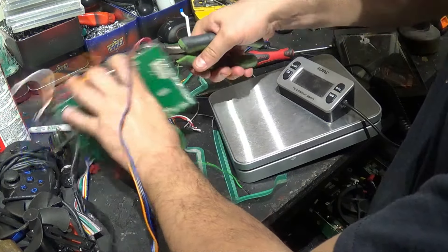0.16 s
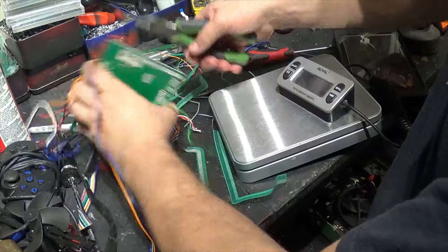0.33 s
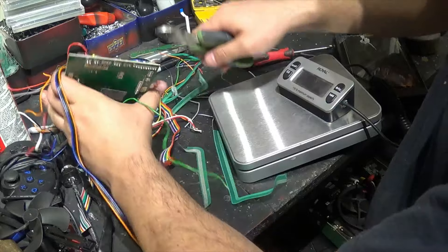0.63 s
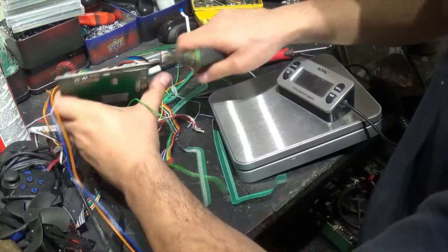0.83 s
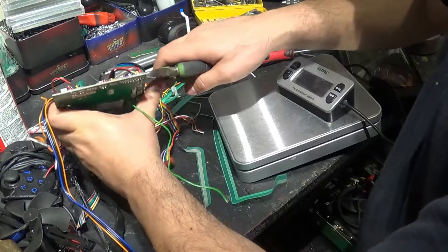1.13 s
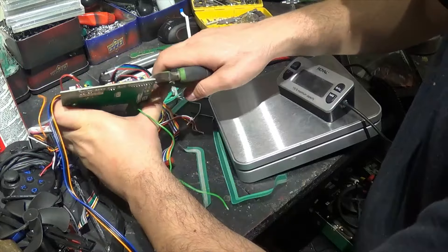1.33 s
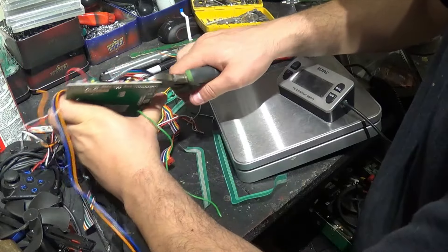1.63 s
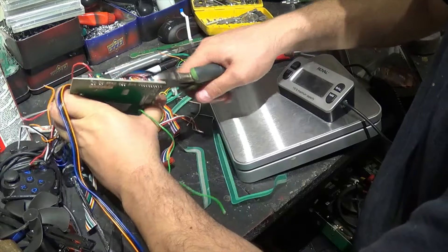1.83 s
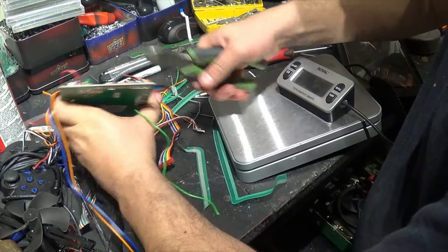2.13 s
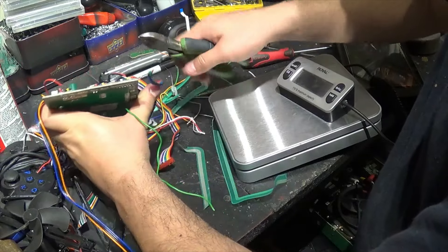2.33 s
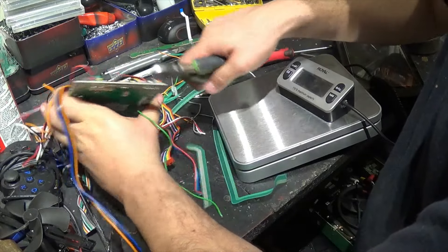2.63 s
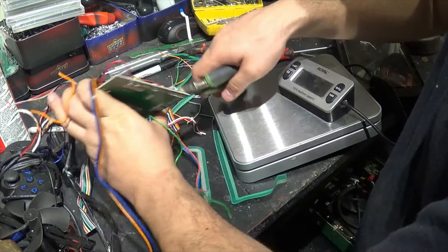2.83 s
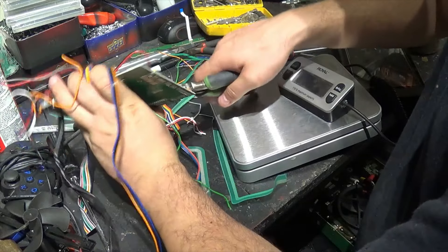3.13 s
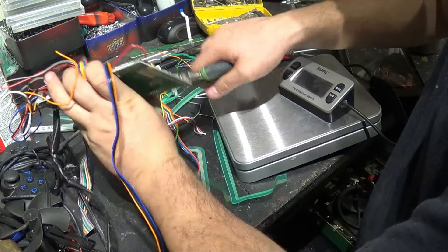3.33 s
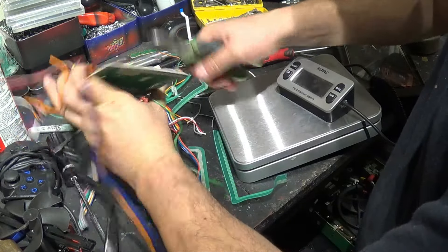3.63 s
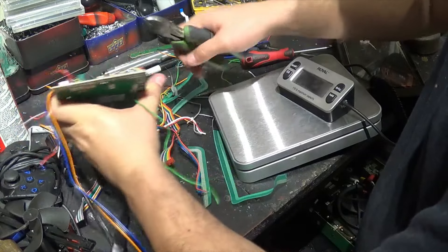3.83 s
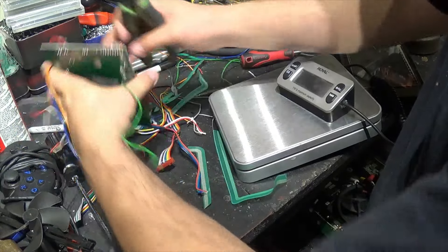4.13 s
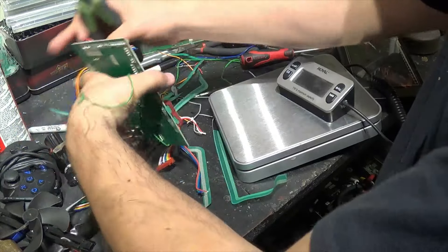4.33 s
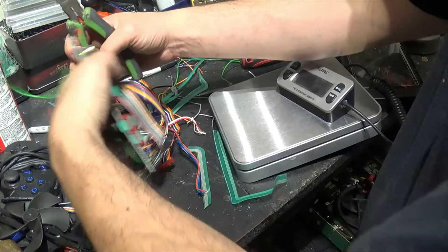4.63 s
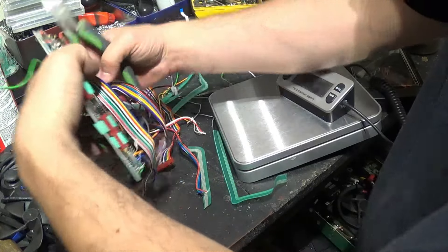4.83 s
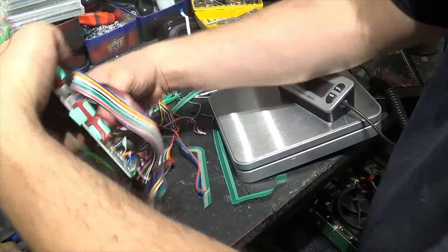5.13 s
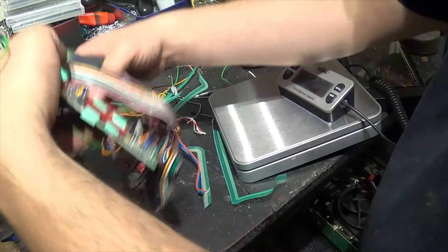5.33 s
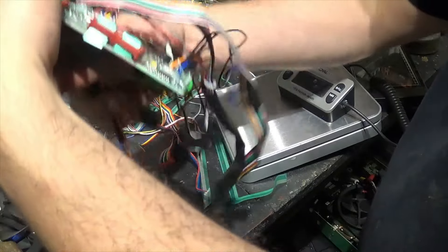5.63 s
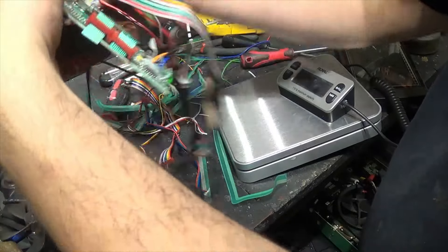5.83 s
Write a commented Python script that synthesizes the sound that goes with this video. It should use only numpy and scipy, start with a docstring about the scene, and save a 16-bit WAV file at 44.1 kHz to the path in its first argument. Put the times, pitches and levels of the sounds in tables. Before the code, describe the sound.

Steel cutter jaws crack crisply through wires on a circuit board: one snip, a tight triple snap, then a duller snip. Insulation rustles, wire drags and loose plugs tick in between. A sharp knock leads to two clattering runs as the board is flipped over, then the sound settles into light rustling. A soft low fan drone continues throughout; close stereo microphones in a small, slightly live room.

```python
"""Hand cutters snip wires off a circuit board: noise bursts ring the jaws in three hard cuts, one a triple crack.
Between cuts, shaped noise makes the wires rustle and scrape, and small ringing bursts make parts tick.
At the end the board is turned over and clatters on the bench: runs of knocks ring its many resonances.
A fan hums throughout, made of wavering tones over soft noise. A small room adds fading noise tails,
and a limiter flattens the loud blows."""
import sys
import numpy as np
from scipy import signal
from scipy.fft import rfft, irfft, next_fast_len
from scipy.io import wavfile
from scipy.ndimage import uniform_filter1d, minimum_filter1d, map_coordinates

SR = 44100
rng = np.random.default_rng(int(sys.argv[2]) if len(sys.argv) > 2 else 0)


def file_out(sig):
    """Save sig as 16-bit WAV at sys.argv[1]."""
    # one column per channel
    cols = np.atleast_2d(sig).T
    # limit, then scale
    lim = np.clip(cols, -1, 1)
    pcm = np.round(lim * 32767).astype(np.int16)
    wavfile.write(sys.argv[1], SR, pcm)


N = 263277
TIME = np.arange(N) / SR  # seconds
TOP_HZ = 11260  # highest frequency kept [Hz]

# Fan tones: (pitch [Hz], average level [dB])
FAN_TONES = [(59.2, -64.5), (118.6, -63.5), (247.6, -89), (292.8, -50.5), (335, -65), (360, -92),
             (387.4, -61), (410, -70.5), (535, -66), (4150, -71.5)]
# Tone balance of the fan's rush of air: (frequency [Hz], relative level [dB per Hz])
AIR_SPECTRUM = [(25, -17), (50, -2), (95, -13), (150, 1), (195, -0.5), (235, 10), (275, 0), (370, 7),
                (490, -6), (560, -5), (800, -6.5), (2000, -12), (4500, -16.5), (11000, -24.5)]
# Fan direction: (frequency [Hz], lead of left over right [rad], negative = right leads)
FAN_LEAD = [(60, -0.28), (130, -0.022), (300, -0.28), (1200, -1.2), (5000, -0.77), (10000, -0.71)]

# How briskly the cable bundle shifts in the hand: (time [s], base level [dB])
HANDLING = [(0.0, -57.5), (0.23, -59.5), (0.35, -56.5), (0.53, -61), (1.18, -68), (3.39, -64), (3.57, -58),
            (3.77, -70), (4.01, -61), (4.12, -59), (5.12, -55.5), (5.47, -63), (5.64, -61), (5.97, -61)]
RUSTLE_DB, RUB_DB, RUB_SWING_DB = 2.5, 4, 0.5  # rustle and light rubbing, added to the handling level
STRAY_DB, STRAY_SPREAD_DB = 12, 3  # stray wire ends, added to the handling level
# Tone balance of rustling insulation: (frequency [Hz], relative level [dB per Hz])
RUSTLE_SPECTRUM = [(60, -40), (400, -13), (1000, -3), (2500, -9), (5000, -5), (8000, -9.5), (11000, -3.5)]
# A wire drags over the board:
# (middle time [s], length [s], level [dB], treble boost [dB], most excited frequency [Hz])
SCRAPES = [(0.159, 0.074, -37, 16, 656), (0.28, 0.14, -40, 7, 1770), (.712, 0.056, -50.5, 15, 5500),
           (0.9, 0.063, -48, 19, 5500), (1.338, 0.075, -54.5, -6, 1900), (1.609, 0.026, -47, 17, 5100),
           (2.141, 0.083, -43, 4.5, 1340), (2.921, 0.11, -44, -3, 1750), (3.731, 0.1, -40, -14, 564),
           (4.016, 0.12, -50.5, 17.5, 5200), (4.506, 0.23, -45, 9, 600), (4.862, 0.2, -47, 4, 1220),
           (5.006, 0.081, -42.5, 5, 1770), (5.29, 0.097, -40, 17.5, 1720), (5.437, 0.12, -40, 8, 900),
           (5.727, 0.12, -42.5, -20, 1000)]
# Tone balance of dragging wire: (frequency [Hz], relative level [dB per Hz])
DRAG_SPECTRUM = [(60, -36), (250, 5.5), (500, 10), (1000, 8.5), (1800, 4.5), (2800, 1), (5500, -10.5),
                 (11000, -18)]

# The jaws bite through, strand after strand:
# (time [s], level [dB], bass boost [dB], treble boost [dB], time for the chatter to drop 60 dB [s])
SNIPS = [(0.0752, -9, 2, 2.5, 0.011), (1.936, -7.5, 14.5, 9.5, 0.009), (1.951, -13.5, 3, 0, 0.073),
         (1.968, -16, 7, 4.5, 0.061), (3.4611, -12.5, 4, -9.5, 0.024)]
# Ringing of the steel jaws: (average pitch [Hz], width [Hz], average strength [dB])
JAW_MODES = [(1530, 154, 9), (1670, 260, 0.5), (2153, 500, 0), (3730, 1050, 1.5), (3960, 180, 4),
             (4700, 510, -10), (6400, 1050, -4)]
# Tone balance of the jaws' crack: (frequency [Hz], relative level [dB per Hz])
JAW_SPECTRUM = [(60, -59), (300, -21), (800, -13.5), (1300, -2), (3000, -10.5), (5000, -3.5), (8000, -7),
                (11000, -4.5)]

# A plug or the tool taps the board:
# (time [s], level [dB], bass boost [dB], treble boost [dB], time for the chatter to drop 60 dB [s])
TICKS = [(0.8297, -45, -8, 17, .012), (1.12, -41, -13, -7, 0.052), (2.17, -42, -24, 52, 0.032),
         (2.5203, -22, -10, 2.5, 0.028), (3.5588, -23, -21, -11.5, 0.03), (3.6001, -32.5, -5, 4, .016),
         (3.6598, -30, -6, 13.5, 0.01), (3.716, -22.5, -14, -5, 0.038), (4.035, -38, 13, -7, 0.028),
         (4.2115, -29, 7, 32, 0.003), (4.5442, -28.5, 12, 10.5, 0.02), (4.967, -32.5, -2, -9, 0.011),
         (5.1506, -24, 15.5, 1.5, 0.053), (5.687, -39.5, 3, 0, 0.023), (5.7007, -37.5, 26, 20, 0.0081),
         (5.945, -38, 3, 6, 0.017)]
# Tone balance of a tap: (frequency [Hz], relative level [dB per Hz])
TAP_SPECTRUM = [(60, -24), (250, 5.5), (550, 8.5), (1100, 0), (1800, 7.5), (2700, 4), (3700, 2), (6000, -3),
                (11000, -9)]
# Loose plugs jostle in a quick run of taps:
# (start time [s], run length [s], first level [dB], bass boost [dB], treble boost [dB])
JOSTLES = [(4.183, .043, -32, -1.5, -3.5), (5.303, .03, -27.5, -18, 6.5), (5.527, .04, -25, -0.5, 0.5)]
JOSTLE_STEP_S, JOSTLE_T60_S = 0.011, 0.066  # gap between taps; time for each chatter to drop 60 dB
JOSTLE_CHANGE_DB = -0.14  # level change from tap to tap

# The board hits the bench once: (time [s], level [dB], bass boost [dB], treble boost [dB],
# time for the chatter to drop 60 dB [s], most excited frequency [Hz])
KNOCKS = [(2.4891, -28, 1.5, 2, 0.08, 1920), (2.586, -37.5, 3, 2, 0.013, 980),
          (2.75, -41.5, 5, -9.5, 0.013, 1130), (2.955, -37.5, 10, -12, .033, 583),
          (4.0834, -15.5, -0.5, 3.5, 0.028, 1910), (4.661, -30.5, 10, 16.5, 0.16, 570),
          (5.312, -19, 7.5, 15, .015, 854), (5.4419, -9, 10.5, 20, 0.025, 337),
          (5.79, -27, -5, 9.5, 0.03, 1720)]
# The board lands and rocks from edge to edge: (start time [s], first level [dB], loss per contact [dB],
# first bass boost [dB], first treble boost [dB], most excited frequency at first contact [Hz], at last [Hz])
CLATTERS = [(5.042, -5.5, 3.5, -6, -13, 1710, 700), (5.467, -10.5, 0.83, -8, -16, 1140, 1210)]
ROCK_STEP_S, ROCK_T60_S = 0.0245, 0.073  # gap between contacts; time for each chatter to drop 60 dB
ROCK_BASS_DB, ROCK_TREBLE_DB = 4.5, 1.5  # extra bass and treble boost with each contact
# Ringing of the board: (pitch [Hz], width [Hz], strength [dB])
BOARD_MODES = [(346, 33, 1.5), (405, 29, 6), (518, 39, 3), (640, 100, 1), (863, 51, 10), (927, 200, 5.5),
               (1136, 89, 0.5), (1377, 125, 1.5), (1632, 156, 0), (2147, 150, -2.5), (2600, 120, -7),
               (3150, 120, -31)]
# Tone balance of the board's thud: (frequency [Hz], relative level [dB per Hz])
BOARD_SPECTRUM = [(30, -52), (70, -19.5), (200, -5), (400, -1), (1200, -1.5), (2200, -11), (4000, -15),
                  (7000, -22), (11000, -32)]

# How long the room rings: (frequency [Hz], time to drop 60 dB [s])
ROOM = [(150, 0.37), (800, 0.21), (2000, 0.27), (5000, 0.26), (11000, 0.22)]
# How alike left and right are in spread-out sound: (frequency [Hz], likeness [0 to 1])
ALIKE = [(60, 1), (350, 0.88), (1200, 1), (3000, 0.64), (10000, 0.88)]
# Bench direction: (frequency [Hz], lead of left over right [rad], negative = right leads)
BENCH_LEAD = [(60, -0.62), (300, -0.71), (1200, -0.93), (2500, -0.64), (4500, -0.51), (7000, -0.74),
              (11000, -0.47)]


def amp(db):
    """Turn decibels into a plain multiplier."""
    return 10 ** (np.asarray(db) / 20)


def unit(x):
    """Scale to an average (rms) strength of 1."""
    return x / np.sqrt(np.mean(x ** 2) + 1e-20)


def along(points, hz):
    """Read a value between (frequency, value) points, spacing pitch as the ear does."""
    f, v = np.transpose(points)
    return np.interp(np.log(hz + 1), np.log(f + 1), v)


def along_db(points, hz):
    """Read a decibel curve as a plain multiplier."""
    return amp(along(points, hz))


def wobble(rate):
    """A smooth random curve with this many fresh random points a second."""
    points = rng.standard_normal(int(N * rate / SR) + 4)
    return map_coordinates(points, [TIME * rate])


def filtered(x, response):
    """Change the strength and timing of each frequency of x."""
    n = x.shape[-1]
    padded = next_fast_len(n + 8192, True)
    spectrum = rfft(x, padded) * response(np.fft.rfftfreq(padded, 1 / SR))
    return irfft(spectrum, padded)[..., :n]


def causal(gain):
    """A filter with this gain that acts as early as it can, so nothing sounds before the blow."""
    cepstrum = irfft(np.log(np.maximum(gain, 1e-6)))
    half = len(cepstrum) // 2
    cepstrum[1:half] *= 2
    cepstrum[half + 1:] = 0
    return np.exp(rfft(cepstrum))


def shelves(hz, bass_db, treble_db, bass_hz=600, treble_hz=3800):
    """Heavy contacts add bass and hard ones add treble; frequencies above TOP_HZ are cut off."""
    bass = bass_db / (1 + (hz / bass_hz) ** 4)
    treble = treble_db / (1 + (treble_hz / (hz + 1)) ** 4)
    return amp(bass + treble) / (1 + (hz / TOP_HZ) ** 60)


def favoured(hz, centre_hz, boost_db=6, octaves=0.15):
    """The place of contact favours one part of the board's range."""
    return amp(boost_db * np.exp(-(np.log2((hz + 1) / centre_hz) / octaves) ** 2))


def resonant(hz, spectrum, modes):
    """A solid body boosts its own ringing pitches above a broad tone balance."""
    peaks = 0
    for f, width, db in modes:
        off_pitch = (hz * hz - f * f) / ((hz + 1) * width)
        peaks = peaks + 2 * amp(db) ** 2 / (1 + off_pitch ** 2) ** 2
    return np.sqrt(along_db(spectrum, hz) ** 2 + peaks)


def diffuse(pair):
    """Mix two unrelated sounds so left and right become partly alike, as at two close microphones."""
    def mix(hz):
        turn = np.arccos(np.clip(along(ALIKE, hz), 0, 1)) / 2
        return np.array([np.cos(turn), np.sin(turn)])

    mid, side = filtered(pair, mix)
    return np.array([mid + side, mid - side])


def placed(x, lead):
    """Sound from one side reaches that side's microphone first."""
    return filtered(x, lambda hz: np.exp(.5j * np.outer([1, -1], along(lead, hz))))


def in_room(x, wet_db, build=0.00054):
    """Walls add a tail of noise that builds quickly [s], each frequency dying at its own speed."""
    hz, t, noise = signal.stft(rng.standard_normal((2, SR // 3)), SR, nperseg=256)
    fading = noise * amp(-60 * t / along(ROOM, hz)[:, None])
    tail = signal.istft(fading, SR, nperseg=256)[1]
    tail = diffuse(tail * (1 - np.exp(-TIME[:tail.shape[1]] / build)))
    tail = tail / np.linalg.norm(tail[0])
    echo = signal.fftconvolve(x[None], tail, axes=1)[:, :len(x)]
    return x + amp(wet_db) * echo


def grains(rate, spread_db):
    """Many small slips of uneven size make noise whose strength flickers."""
    return unit(rng.standard_normal(N) * amp(spread_db * wobble(rate)))


def blow(s, db, bass_db, treble_db, t60, body, rise, wet_db):
    """One contact: a brief dying chatter rings the body, then the room."""
    size = 2 ** 14
    t, hz = TIME[:size], np.fft.rfftfreq(size, 1 / SR)
    # Tiny slips and rebounds, about one a millisecond
    knots = t[::48]
    crunch = amp(3.06 * np.interp(t, knots, rng.standard_normal(len(knots))))
    envelope = amp(-60 * t / t60) * (1 - np.exp(-t / rise))
    chatter = rfft(rng.standard_normal(size) * crunch * envelope)
    # A snap excites all frequencies fairly evenly, so partly level out the chatter
    power = np.abs(chatter) ** 2
    evened = np.sqrt(power + .5 * power.mean())
    gain = body(hz) * shelves(hz, bass_db, treble_db) / evened
    hit = irfft(chatter * causal(gain / gain.max()))
    # The level counts the direct hit's energy as if spread over 5 ms
    hit *= amp(db) * np.sqrt(SR / 200) / np.linalg.norm(hit)
    return np.pad(in_room(hit, wet_db), ((0, 0), (round(s * SR), N)))[:, :N]


def fan(air_db=-50, waver_db=2.0, drift=0.67):
    """The motor and blades make slightly unsteady tones over a soft rush of air."""
    noise = diffuse(rng.standard_normal((2, N)))
    air = unit(filtered(noise, lambda hz: along_db(AIR_SPECTRUM, hz) * shelves(hz, 0, 0)))
    hum = 0
    for hz, db in FAN_TONES:
        # Phase drift in radians; higher tones wander further
        wander = drift * hz / FAN_TONES[3][0] * wobble(rate=4.5)
        level = amp(db + waver_db * wobble(rate=6.3))
        hum += level * np.sqrt(2) * np.sin(2 * np.pi * hz * TIME + wander)
    return amp(air_db) * air + hum


def handling_db(s):
    """How briskly the bundle is being moved at time s."""
    return np.interp(s, *np.transpose(HANDLING))


def handling():
    """Insulation rustles in the hand and rubs lightly on the board as the bundle moves."""
    rustle = filtered(grains(rate=250, spread_db=5.5),
                      lambda hz: along_db(RUSTLE_SPECTRUM, hz) * shelves(hz, 0, 0))
    rub = filtered(grains(rate=300, spread_db=10),
                   lambda hz: along_db(DRAG_SPECTRUM, hz) * shelves(hz, 0, 0))
    rub_gain = amp(RUB_DB + RUB_SWING_DB * wobble(rate=12))
    return amp(handling_db(TIME)) * (amp(RUSTLE_DB) * unit(rustle) + rub_gain * unit(rub))


def scrapes():
    """A wire drags in short strokes: many small slips swell and fade smoothly."""
    out = np.zeros(N)
    slips = grains(rate=500, spread_db=4.0)
    for s, length, db, treble_db, centre_hz in SCRAPES:
        def colour(hz):
            place = favoured(hz, centre_hz, boost_db=6.5, octaves=0.21)
            return along_db(DRAG_SPECTRUM, hz) * shelves(hz, 0, treble_db) * place

        near = np.abs(TIME - s) < 2 * length
        stroke = np.exp(-(2 * (TIME[near] - s) / length) ** 2)
        out[near] += amp(db) * stroke * unit(filtered(slips[near], colour))
    return out


def wires():
    """Rustling, rubbing and scraping wires are heard directly and through the room."""
    return in_room(handling() + scrapes(), wet_db=-4.5)


def small_part(order=4, lowest_hz=1400, width_hz=140, ring_db=1):
    """A loose part rings at a few random pitches, each as strong as the tap's tone balance allows."""
    pitches = lowest_hz * 2 ** (2.5 * rng.random(order))  # up to 2.5 octaves above the lowest
    modes = [(hz, width_hz, ring_db + along(TAP_SPECTRUM, hz)) for hz in pitches]
    return lambda hz: resonant(hz, TAP_SPECTRUM, modes)


def tap(s, db, bass_db, treble_db, t60):
    """A small light part taps and rings briefly."""
    return blow(s, db, bass_db, treble_db, t60, small_part(), rise=0.0015, wet_db=-5.0)


def wire_ends(count=8):
    """Stray wire ends tick faintly at random moments, harder when the bundle moves more."""
    times = (np.arange(count) + rng.random(count)) * TIME[-1] / count
    levels = handling_db(times) + STRAY_DB + STRAY_SPREAD_DB * rng.standard_normal(count)
    return sum(tap(s, db, bass_db=-1, treble_db=-8.5, t60=0.013) for s, db in zip(times, levels))


def varied(modes, spread_db=3.5, detune=0.022):
    """Each crack rings the jaws at slightly different random pitches and strengths."""
    chance = rng.standard_normal((len(modes), 2))
    return [(hz * (1 + detune * a), width, db + spread_db * b)
            for (hz, width, db), (a, b) in zip(modes, chance)]


def snips():
    """The wire gives way and the steel jaws snap shut and ring."""
    def jaws(hz):
        return resonant(hz, JAW_SPECTRUM, varied(JAW_MODES))

    return sum(blow(*row, jaws, rise=0.000063, wet_db=-1) for row in SNIPS)


def ticks():
    """A plug or the tool makes single taps on the board."""
    return sum(tap(*row) for row in TICKS)


def knock(s, db, bass_db, treble_db, t60, centre_hz):
    """The board rings with a different balance depending on where it is struck."""
    def body(hz):
        return resonant(hz, BOARD_SPECTRUM, BOARD_MODES) * favoured(hz, centre_hz, boost_db=8.0)

    return blow(s, db, bass_db, treble_db, t60, body, rise=0.0015, wet_db=-4.0)


def knocks():
    """The board hits the bench in single knocks."""
    return sum(knock(*row) for row in KNOCKS)


def jostles():
    """Loose plugs bump one another in quick, evenly spaced taps."""
    out = 0
    for s, length, db, bass_db, treble_db in JOSTLES:
        for k, delay in enumerate(np.arange(0, length, JOSTLE_STEP_S)):
            out += tap(s + delay, db + k * JOSTLE_CHANGE_DB, bass_db, treble_db, JOSTLE_T60_S)
    return out


def clatters(count=4):
    """The board lands and rocks through a few evenly spaced contacts, each one weaker."""
    out = 0
    for s, db, loss_db, bass_db, treble_db, first_hz, last_hz in CLATTERS:
        for k, centre_hz in enumerate(np.geomspace(first_hz, last_hz, count)):
            bass, treble = bass_db + k * ROCK_BASS_DB, treble_db + k * ROCK_TREBLE_DB
            out += knock(s + k * ROCK_STEP_S, db - k * loss_db, bass, treble, ROCK_T60_S, centre_hz)
    return out


def scene():
    """The work on the bench and the fan, each from its own direction."""
    bench = wires() + wire_ends() + snips() + ticks() + knocks() + jostles() + clatters()
    balance = amp([[.2], [-.2]])  # left a touch louder, right a touch softer
    return placed(bench, BENCH_LEAD) * balance + placed(fan(), FAN_LEAD)


def record(dry, ceiling_db=-9, recovery_db_per_s=190):
    """A limiter quickly turns down loud peaks and recovers steadily; a filter ends the treble."""
    peak = np.sqrt(2 * np.abs(uniform_filter1d(np.mean(dry ** 2, axis=0), size=64)))
    over_db = np.maximum(20 * np.log10(peak + 1e-9) - ceiling_db, 0)
    # Hold the greatest reduction, letting it shrink at a steady rate
    recovery_db = recovery_db_per_s * TIME
    duck_db = np.maximum.accumulate(over_db + recovery_db) - recovery_db
    gain = uniform_filter1d(minimum_filter1d(amp(-duck_db), size=12), size=24)
    return filtered(dry * gain, lambda hz: 1 / (1 + (hz / TOP_HZ) ** 120))


dry = scene()
out = record(dry)
file_out(out)
```